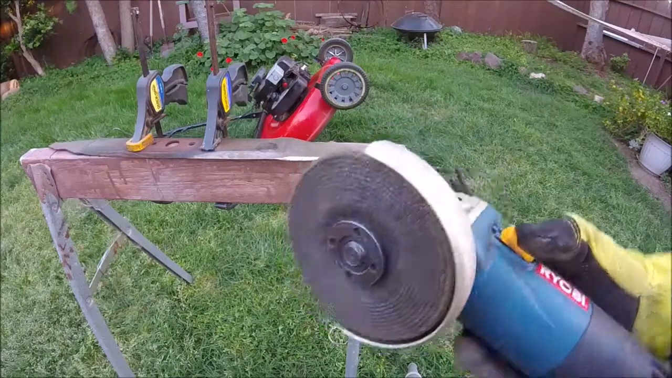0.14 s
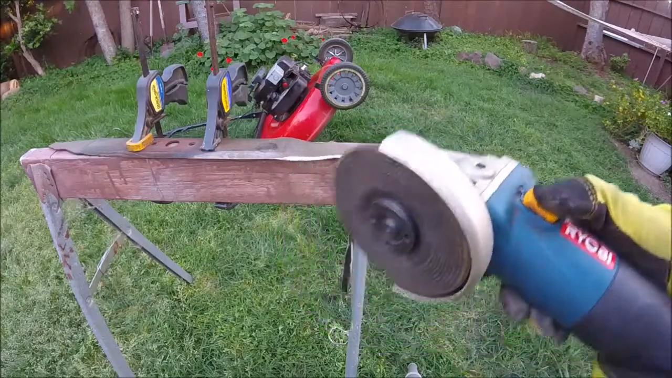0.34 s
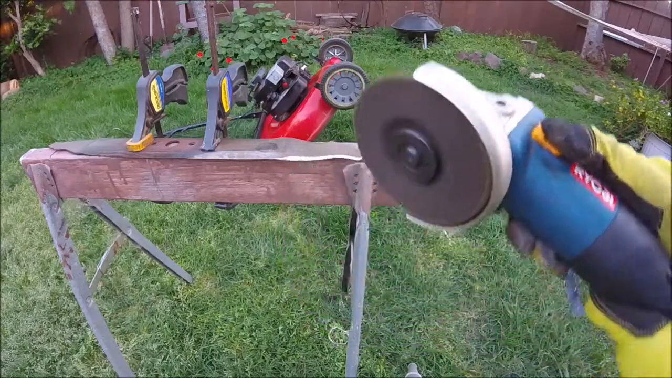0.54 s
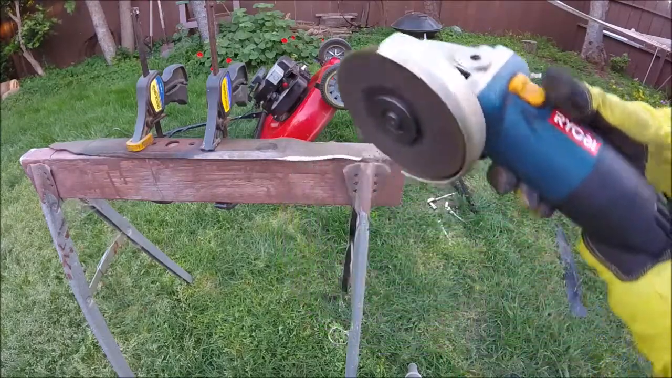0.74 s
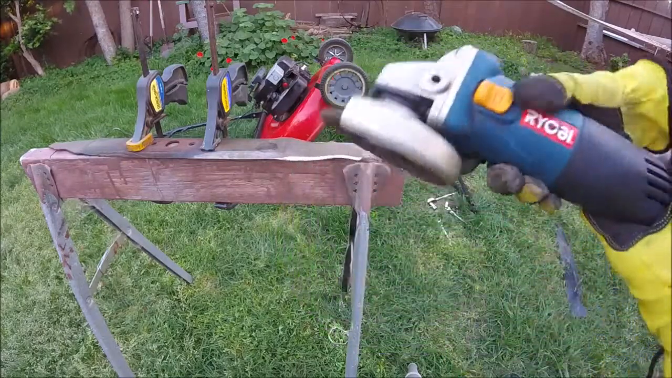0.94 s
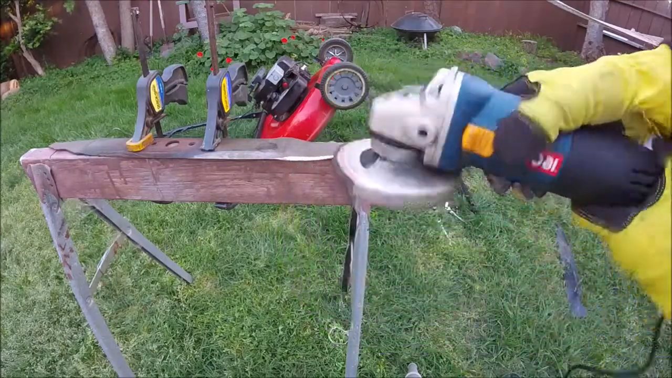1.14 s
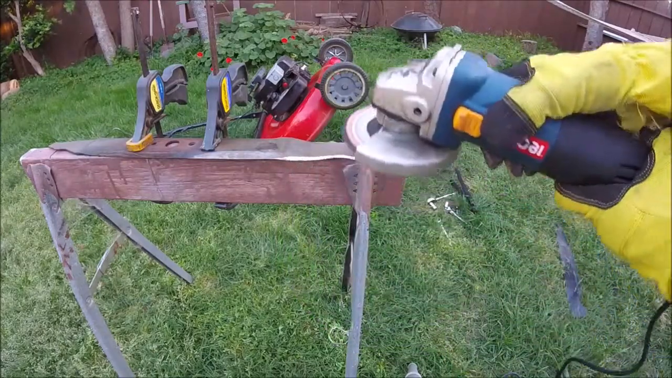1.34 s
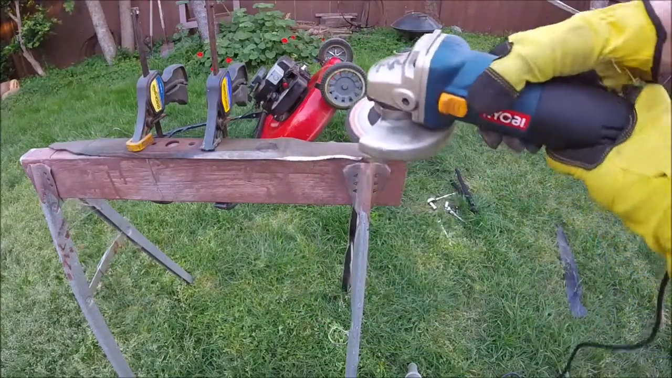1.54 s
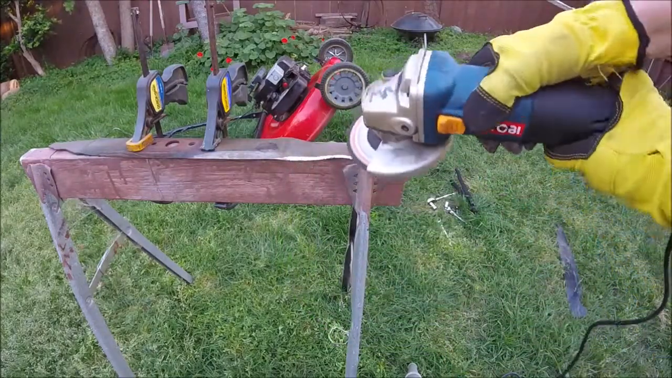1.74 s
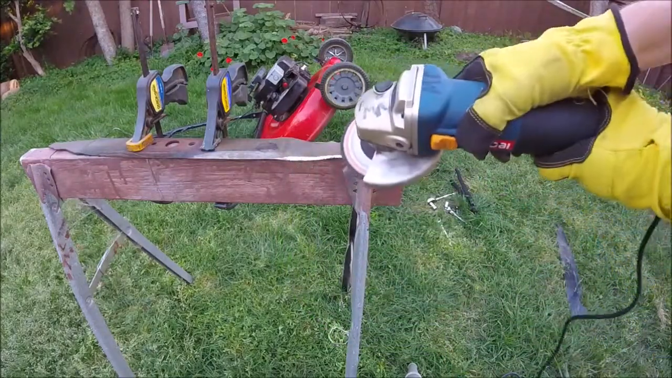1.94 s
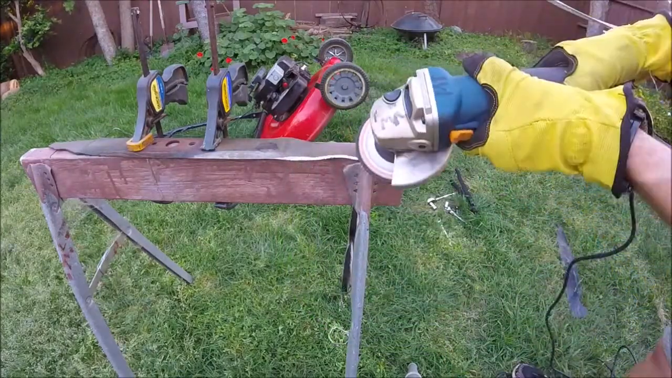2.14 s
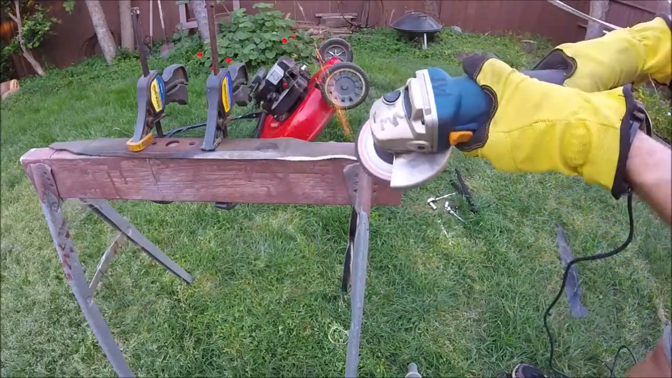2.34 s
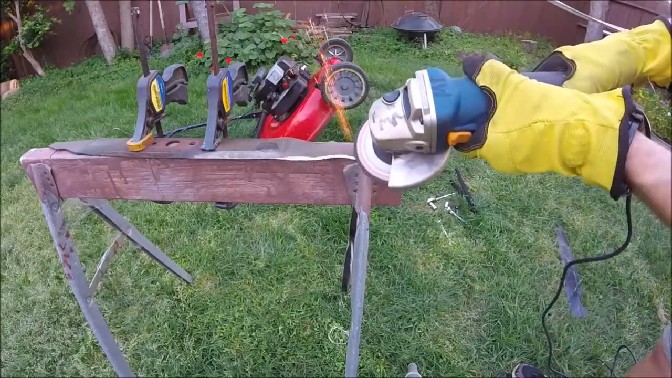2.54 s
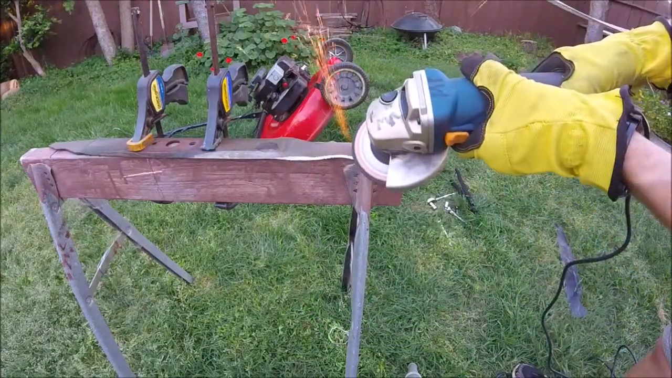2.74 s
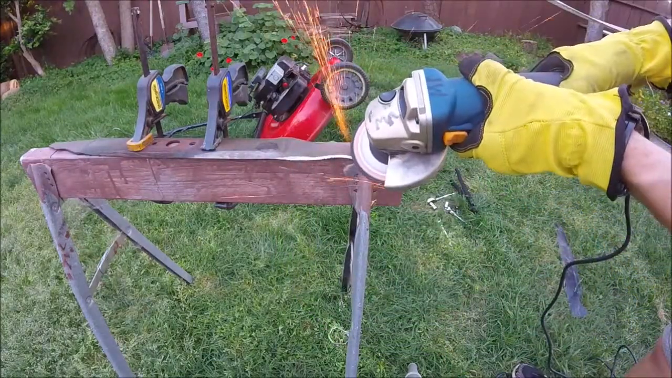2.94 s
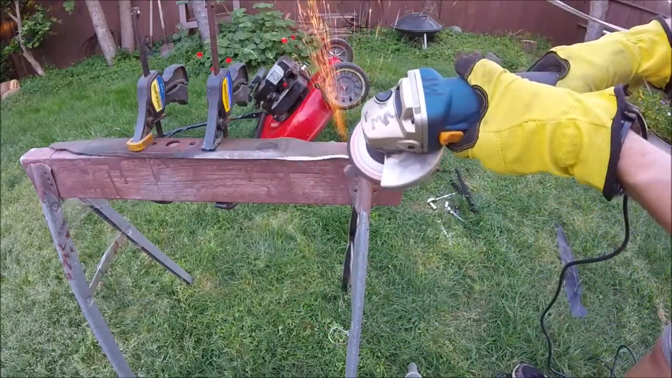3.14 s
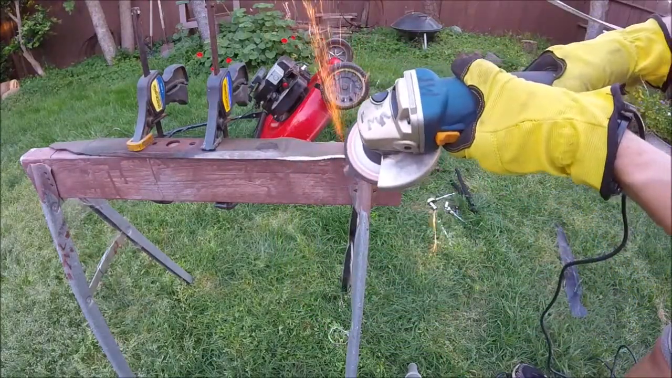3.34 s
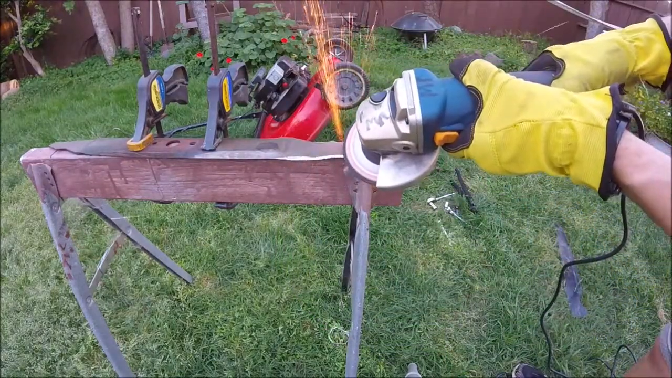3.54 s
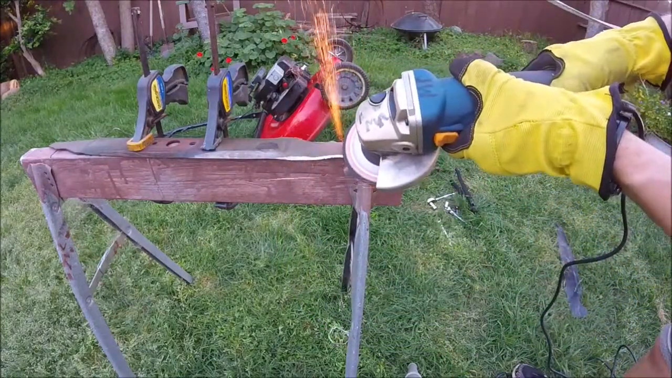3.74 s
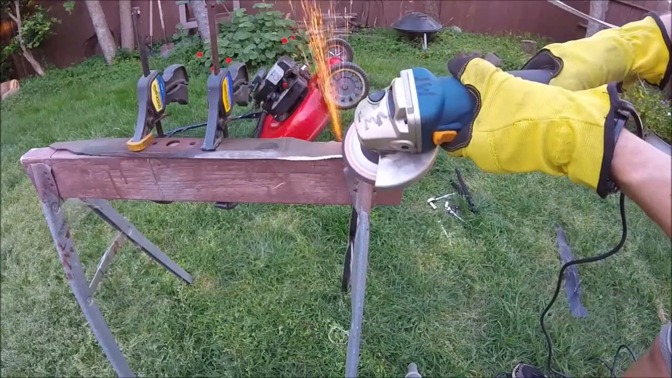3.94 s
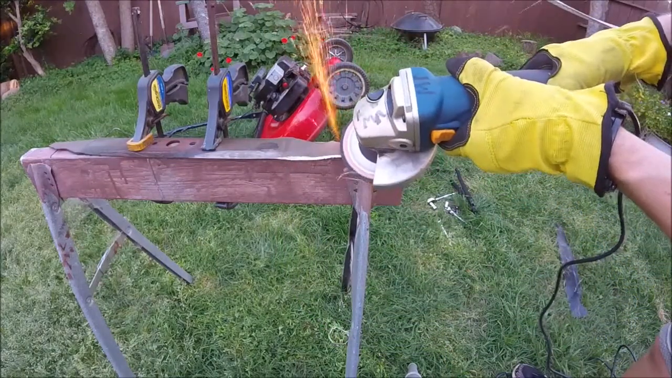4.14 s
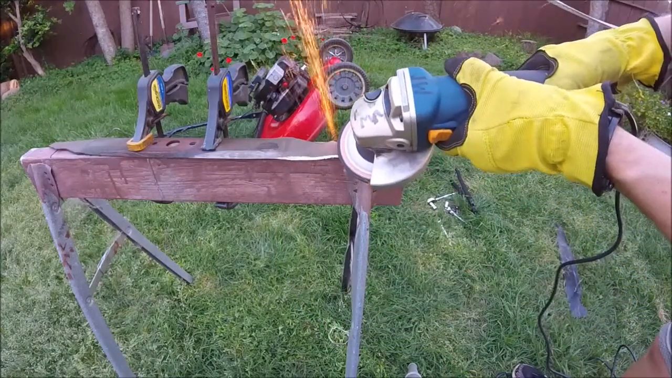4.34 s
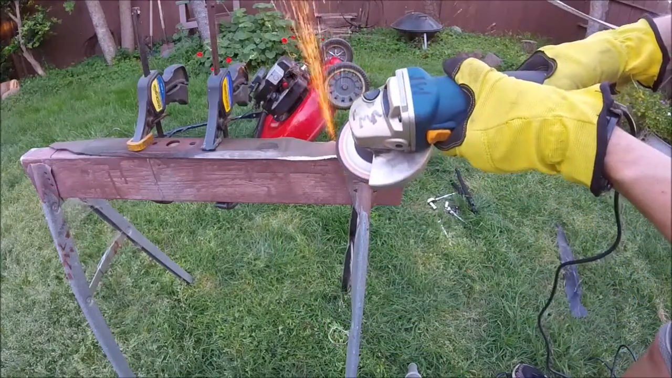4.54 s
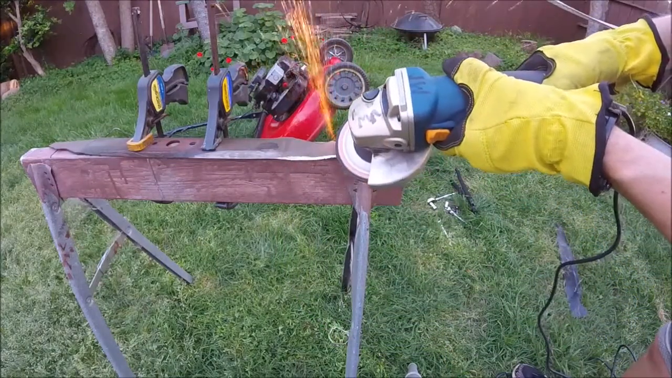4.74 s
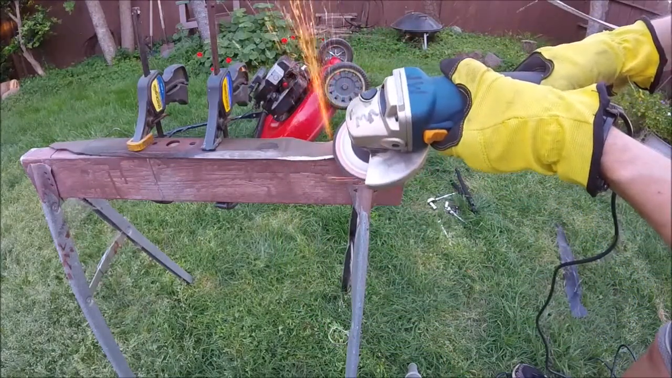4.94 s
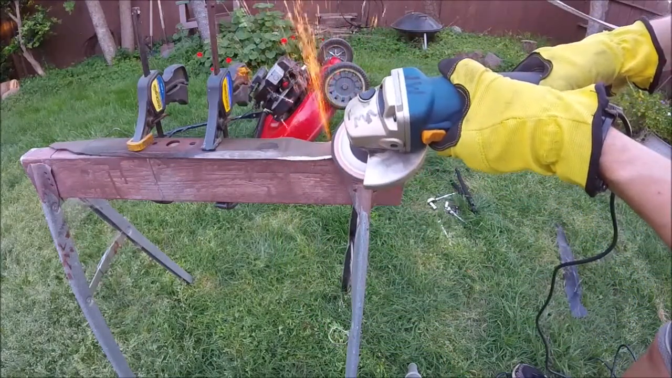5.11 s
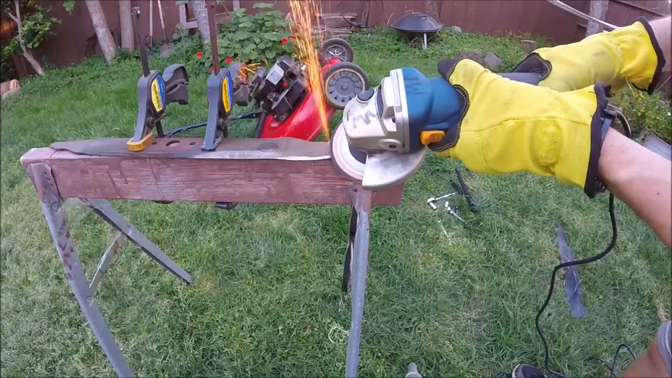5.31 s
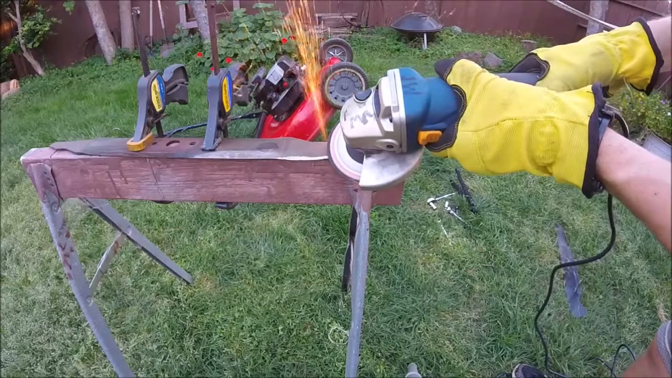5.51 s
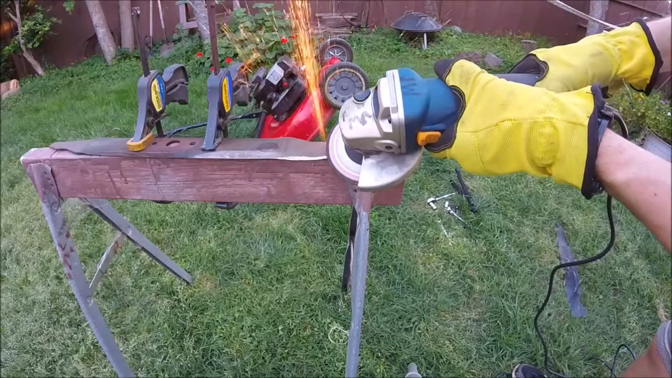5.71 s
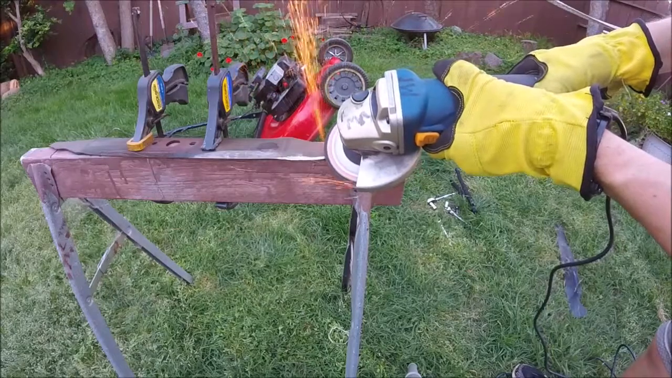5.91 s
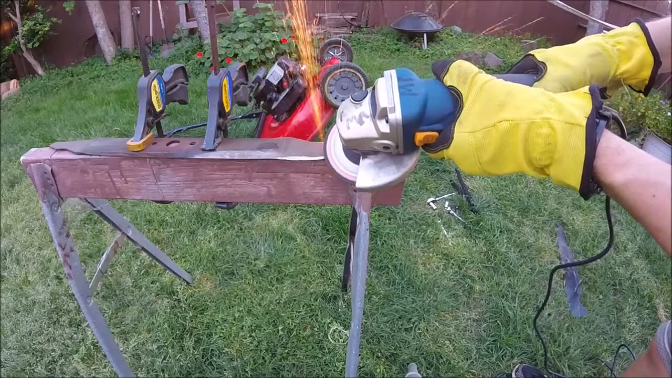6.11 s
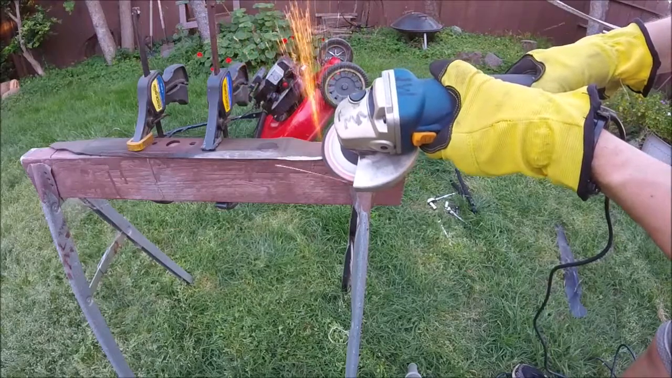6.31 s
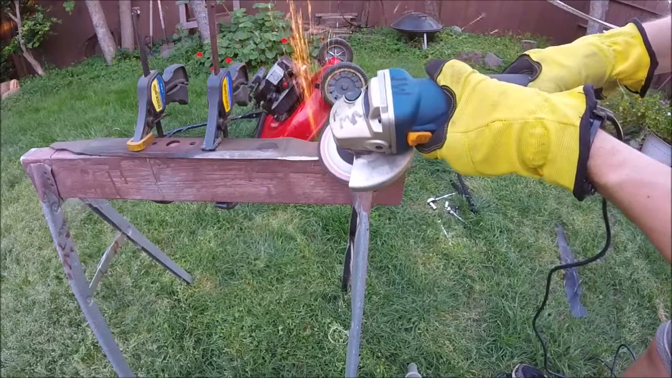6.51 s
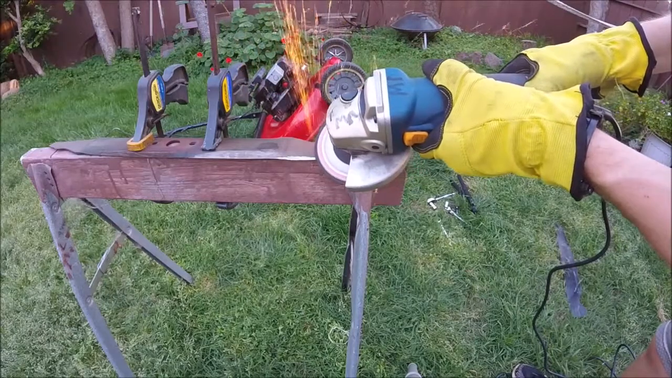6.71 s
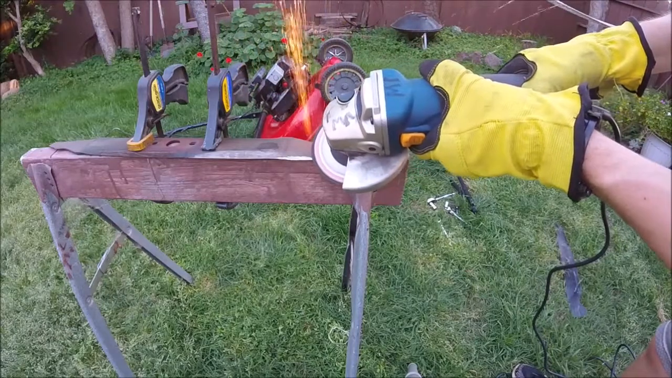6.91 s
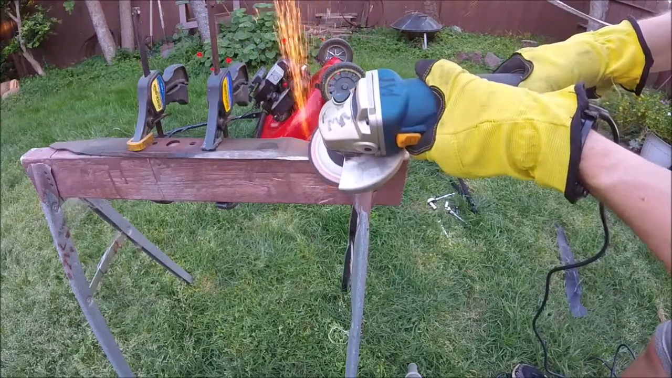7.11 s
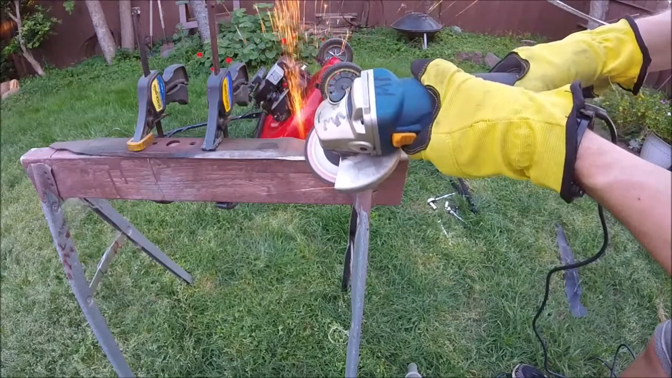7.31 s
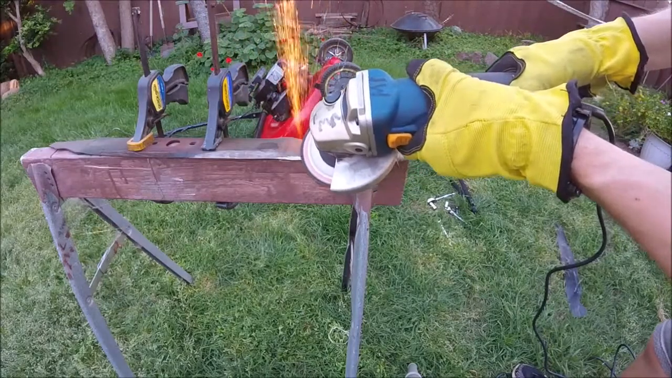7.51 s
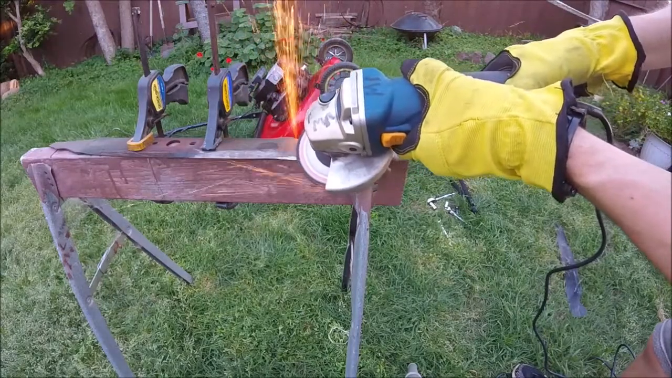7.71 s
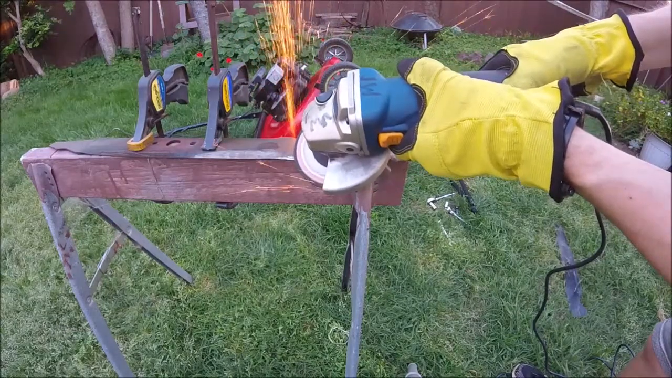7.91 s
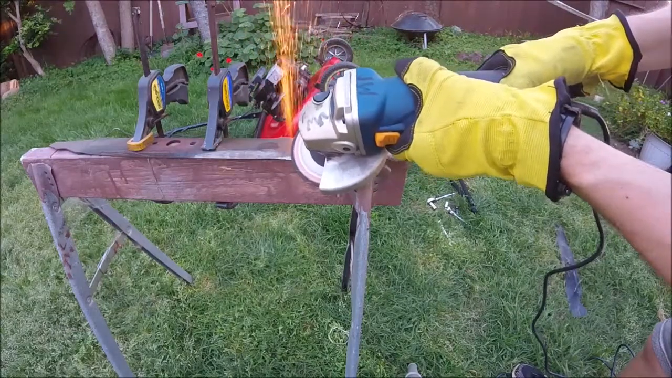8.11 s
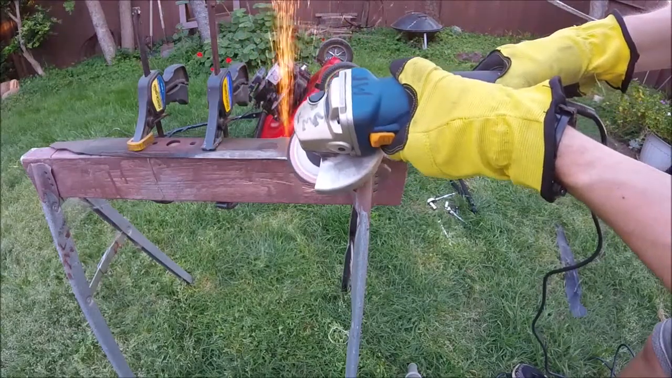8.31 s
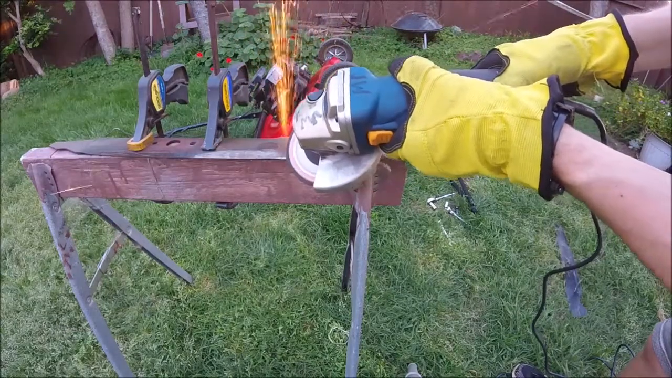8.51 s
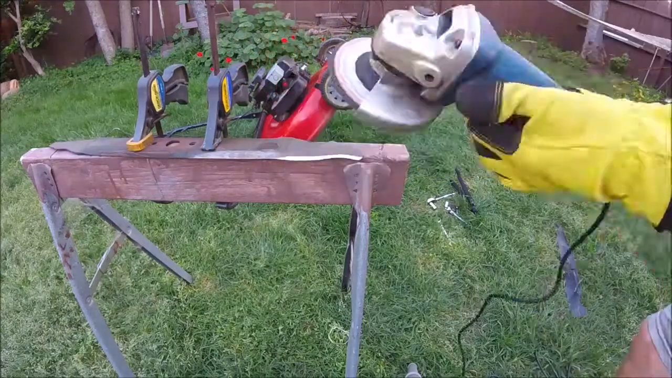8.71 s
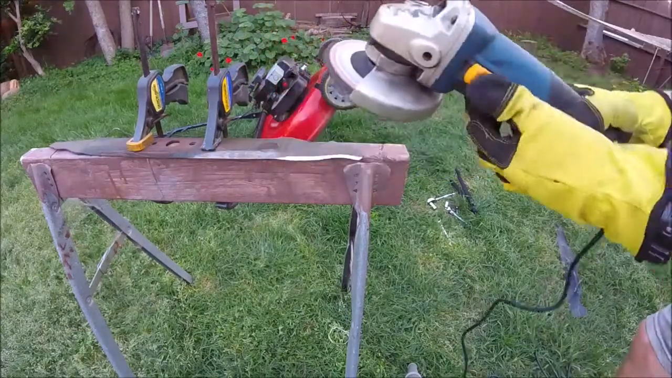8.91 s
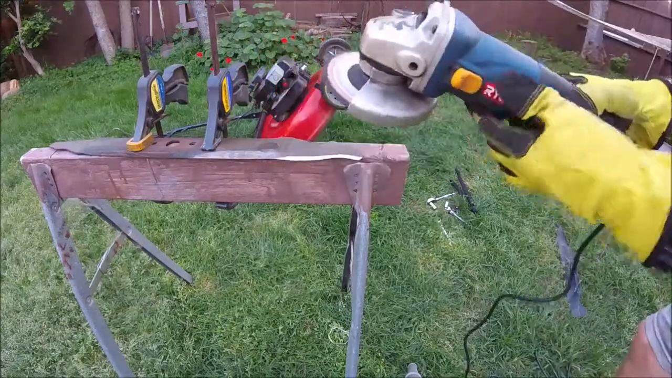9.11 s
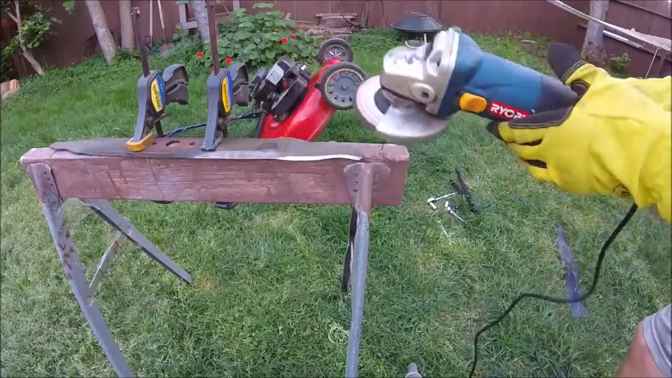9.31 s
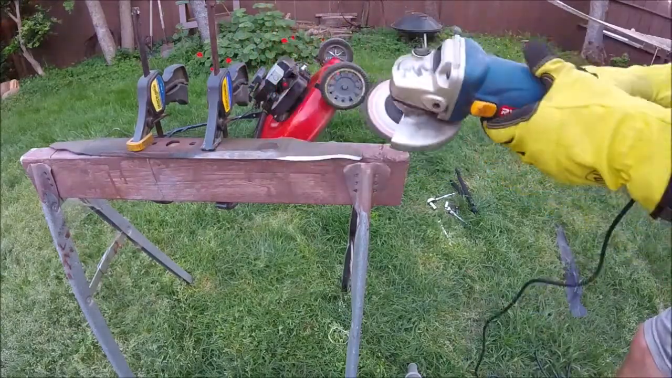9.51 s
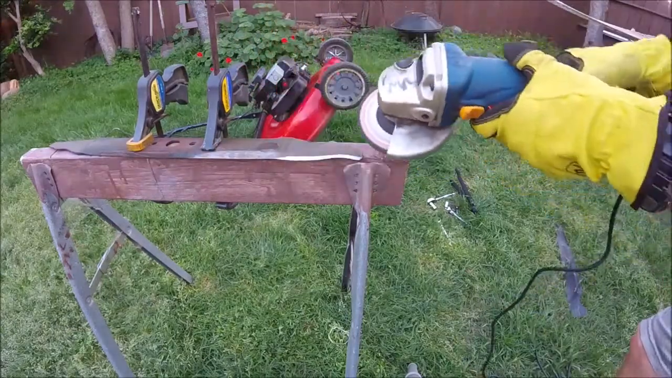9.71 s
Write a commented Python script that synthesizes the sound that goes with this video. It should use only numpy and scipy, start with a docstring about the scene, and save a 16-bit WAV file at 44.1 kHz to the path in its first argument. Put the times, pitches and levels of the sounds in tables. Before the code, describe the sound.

Close to the microphone in a back yard, an angle grinder starts with a clack of gears and spins up with a rising, rattling whine. After a tiny gap it grinds a steel mower blade, rasping, ringing and fizzing while its pitch slowly sags. Another tiny gap follows, then it runs free and begins to coast down. Air lightly buffets the microphone over a faint outdoor wash.

```python
"""An angle grinder sharpens a steel mower blade in a back yard, close to the microphone.
It kicks into life with a clack of gears; its fan hums and its bevel gears rattle and whine.
The disc rasps the steel once a turn and sets it ringing while the load drags the speed down.
Two edit cuts leave brief silent gaps between spin-up, grinding and coasting.
Air, probably from the grinder's fan, buffets the microphone, over the faint wash of the yard."""
import sys
import numpy as np
from scipy import signal
from scipy.fft import rfft, irfft
from scipy.io import wavfile
from scipy.ndimage import uniform_filter1d

SR = 44100
rng = np.random.default_rng(int(sys.argv[2]) if len(sys.argv) > 2 else 0)


def to_wav(s):
    """Save 16-bit WAV."""
    ch = np.atleast_2d(s).T  # columns
    pcm = np.round(np.clip(ch, -1, 1) * 32767)  # PCM
    wavfile.write(sys.argv[1], SR, pcm.astype(np.int16))


N = 429975
T = np.arange(N) / SR
PINION_TEETH, CROWN_TEETH = 13, 38
IDLE_HZ, BAND_LIMIT_HZ = 528, 15300
TOUCH_S, LIFT_S, POWER_OFF_S = 2.17, 8.775, 8.965

# body of the gear case and guard: frequency_hz, level_db
CASE_BODY = [(100, -36), (250, -20), (400, -13.5), (560, -6.5), (700, -1.5), (900, -2.5), (1060, -1),
             (1250, -5.5), (1450, -11), (1750, -21), (2100, -43)]
# their treble response: frequency_hz, level_db
CASE_TREBLE = [(1400, -39), (1850, -6.5), (2300, 5), (2650, 2.5), (3100, -7), (3950, 1), (4650, -12),
               (5900, -1.5), (6900, -6), (7900, -18), (9200, -24.5), (10800, -19), (13000, -21.5),
               (15000, -36.5)]
# ringing modes of the case: pitch_hz, width_hz, level_db
CASE_MODES = [(978, 20, 1), (1058.4, 24, 0)]


def gain_of(db):
    """Decibels to amplitude."""
    return 10 ** (np.asarray(db) / 20)


def unit_rms(x):
    """Scales to rms 1."""
    return x / np.sqrt(np.mean(x ** 2) + 1e-20)


def curve(rows):
    """Every column after the first, joined by straight lines in time."""
    times, *columns = np.transpose(rows)
    return [np.interp(T, times, column) for column in columns]


def drift(hz, size=2 ** 15):
    """Random wander of rms 1, up to about hz."""
    rolloff = 1 + (np.fft.rfftfreq(size, T[-1] / size) / hz) ** 4
    slow = irfft(rfft(rng.standard_normal(size)) / rolloff)
    return unit_rms(np.interp(T, np.linspace(0, T[-1], size), slow))


def narrow_noise(turns, hz):
    """Noise of rms 1 within about hz of a moving tone."""
    return unit_rms((np.exp(2j * np.pi * turns) * (drift(hz) + 1j * drift(hz))).real)


def colour(x, points, size=4096):
    """Causal filter with the given spectrum."""
    hz, db = np.transpose(points)
    log_hz = np.log(abs(np.fft.fftfreq(size, 1 / SR)) + 1)
    log_gain = np.log(gain_of(np.interp(log_hz, np.log(hz + 1), db)))
    taps = np.fft.ifft(np.exp(np.conj(signal.hilbert(log_gain)))).real
    return signal.oaconvolve(x, taps[:size // 2])[:len(x)]


def resonate(x, hz, width_hz):
    """One resonance of gain 1."""
    return signal.lfilter(*signal.iirpeak(hz, hz / width_hz, SR), x)


def knocks(per_s, spread_db):
    """Random clicks of uneven size."""
    size = gain_of(spread_db * np.minimum(rng.exponential(1, N), 4))
    return unit_rms(size * rng.choice([-1, 1], N) * (rng.random(N) < per_s / SR))


def bounces(phase, fall_turns, spread_db=1.0):
    """An envelope of rms 1 that jumps unevenly at each whole turn of the phase and dies away."""
    size = gain_of(spread_db * rng.standard_normal(2048))[phase.astype(int) % 2048]
    return unit_rms(uniform_filter1d(size * np.exp(-(phase % 1) / fall_turns), size=110))


def yard():
    """The faint, steady wash of the back yard."""
    # its spectrum: frequency_hz, level_db
    wash = [(60, -11), (120, 7.5), (200, 0), (500, -6.5), (1000, -3.5), (1700, -26), (2500, -25),
            (6000, -32.5), (9000, -37), (15000, -53)]
    return gain_of(-45) * unit_rms(colour(rng.standard_normal(N), wash))


def air_on_microphone():
    """Air, probably from the grinder's fan, buffets the microphone, with gusts and a low rumble."""
    # buffeting on the microphone: frequency_hz, level_db
    spectrum = [(20, -23), (46, 6.5), (70, 3), (110, -8), (170, -14), (300, -51), (1000, -73), (3000, -93)]
    # gusts on top of it: centre_s, half_length_s, level_db
    gusts = [(2.103, 0.25, -43), (8.88, .1, -33), (9.718, .09, -49)]
    # course of the rumble: time_s, level_db
    rumble_levels = [(0, -40), (.8, -52), (2.2, -37), (2.55, -32), (3.3, -38), (5.8, -37), (7.2, -54)]
    strength = gain_of(-46 + 0.62 * T)
    strength += sum(gain_of(db) * np.exp(-((T - s) / half) ** 2) for s, half, db in gusts)
    buffeting = unit_rms(colour(rng.standard_normal(N), spectrum, size=16384))
    rumble = narrow_noise(34.2 * T, hz=3.4) * gain_of(curve(rumble_levels)[0])
    return buffeting * strength + rumble


def motor_speed(power_on_s=.445, limit_hz=545.4, halfway_s=.2757, coast_s=4.15):
    """Turns a second: the motor spins up, labours on the steel, idles and coasts down."""
    # the motor under load: time_s, speed_hz
    loaded = [(2.18, 479), (2.45, 489.3), (2.85, 495.3), (3.42, 494.8), (3.8, 489), (4.25, 484.6),
              (5, 479.5), (5.7, 476.9), (6.1, 473), (6.35, 472), (6.85, 473.6), (7.4, 468.6), (7.95, 459.9),
              (8.76, 452.5)]
    age = np.maximum(T - power_on_s, 0)
    spin_up = limit_hz * age / (age + halfway_s)
    coasting = IDLE_HZ * np.exp(-np.maximum(T - POWER_OFF_S, 0) / coast_s)
    return np.select([T < TOUCH_S, T < LIFT_S], [spin_up, curve(loaded)[0]], coasting)


def pressed():
    """1 while the disc is on the steel, else 0."""
    return (T > TOUCH_S) * (T < LIFT_S)


def drive_gain(speed, idle_db, doubling_db, load_db, slack_db=0, jolt_db=0):
    """Gain of one part of the grinder, from its speed, its load and the state of the drive."""
    doublings = np.log2(np.maximum(speed, 1) / IDLE_HZ)
    load = pressed() * 10 * (1 - speed / IDLE_HZ)  # tenths of speed lost
    slack = np.clip((T - POWER_OFF_S) / 0.47, 0, 1)  # the drive goes slack after switch-off
    jolt = np.exp(-np.maximum(T - 0.53, 0) / 0.052)  # the jolt of the start dies away
    running_db = idle_db + doubling_db * doublings + load_db * load
    return gain_of(running_db + slack_db * slack + jolt_db * jolt)


def lulls():
    """Gain of the treble through its brief dips."""
    # dips: centre_s, half_length_s, level_db
    dips = [(1.715, .011, -4), (1.935, .015, -9), (4.215, .013, -6), (6.228, .02, -4)]
    return gain_of(sum(db * np.exp(-((T - s) / half) ** 2) for s, half, db in dips))


def roughness(turns, wear_turns, size=2048, count=32):
    """The bumps of a turning part come round every turn and slowly shift into a new pattern."""
    spectra = rfft(rng.standard_normal((count, size // 8)))
    finest = int(BAND_LIMIT_HZ / (SR * np.diff(turns).mean()))
    patterns = irfft(spectra[:, :finest], size)
    age = turns / wear_turns
    place = (turns % 1 * size).astype(int) % size
    old = patterns[age.astype(int) % count, place]
    new = patterns[(age.astype(int) + 1) % count, place]
    blend = age % 1 * np.pi / 2
    return unit_rms(np.cos(blend) * old + np.sin(blend) * new)


def fan_hum(speed, turns):
    """The fan and rotor sound their turning rate."""
    # partials of the hum: motor_order, level_db
    partials = [(1, -0.5), (2, -32), (3, -12)]
    tones = np.sqrt(2) * sum(gain_of(db) * np.sin(2 * np.pi * round(k) * turns) for k, db in partials)
    level = drive_gain(speed, idle_db=-20.5, doubling_db=11, load_db=-3.5, slack_db=-10)
    waver = gain_of(0.5 * drift(24.5) + 1.6 * drift(2.0))
    fade_in = np.clip((T - .6) / 0.16, 0, 1)
    return tones * level * waver * fade_in


def howl(speed):
    """A howl near 1 kHz follows the motor at a little over twice its rate, running free and while grinding."""
    # course of the howl: time_s, level_db, motor_order
    course = [(.8, -37, 2), (1.3, -21, 2), (2.5, -37, 2.05), (3.7, -18.5, 2.1), (4.7, -22, 2.15),
              (6.4, -42, 2.22), (7.8, -22.5, 2.28), (8.7, -30.5, 2.2), (8.82, -17.5, 2.1), (9.25, -24, 2.3)]
    level_db, order = curve(course)
    return narrow_noise(np.cumsum(speed * order) / SR, hz=52) * gain_of(level_db)


def gear_case(blows):
    """Blows sound the body of the case and set its modes ringing."""
    body = colour(blows, CASE_BODY)
    return body + sum(gain_of(db) * resonate(body, hz, width) for hz, width, db in CASE_MODES)


def gear_whine(speed, turns, lash):
    """The mesh whines in short bursts and swells as it climbs through each resonance of the case."""
    mesh = narrow_noise(PINION_TEETH * turns, hz=210) * (0.38 + 1.12 * lash)
    mesh *= drive_gain(speed, idle_db=-31.5, doubling_db=-0.5, load_db=-19, slack_db=-7, jolt_db=-5)
    mesh *= 0.92 + .5 * np.sin(2 * np.pi * turns)  # the pinion runs slightly off centre
    return colour(mesh, CASE_TREBLE)


def gear_head(speed, turns, lash_per_s=55, critical_hz=404):
    """Loose teeth rattle and tick against the case, joined by the mesh's whine and the howl."""
    torque = 1 + 0.12 * np.sin(2 * np.pi * 120 * T)  # the mains pulls twice a cycle
    teeth = roughness(turns * PINION_TEETH / CROWN_TEETH, wear_turns=40.17)
    blows = unit_rms(knocks(per_s=1500, spread_db=1.03) + .5 * rng.standard_normal(N) + 0.29 * teeth)
    blows *= torque * gain_of(1.1 * drift(51))
    rattle = unit_rms(gear_case(blows))
    rattle *= drive_gain(speed, idle_db=-15.5, doubling_db=8.5, load_db=-1, slack_db=-4, jolt_db=13.5)
    midrange = rattle + howl(speed)
    # the teeth swing across their backlash, and knock hardest around one critical speed
    lash = bounces(np.cumsum(lash_per_s * gain_of(2.5 * drift(20))) / SR, fall_turns=0.5)
    burst_depth = .55 - 0.15 * pressed() + 0.57 * np.exp(-((speed - critical_hz) / 21) ** 2)
    clatter = unit_rms(blows * (1 + 0.11 * rng.standard_normal(N)) + 0.17 * teeth)
    ticks = unit_rms(colour(clatter * (1 + burst_depth * lash), CASE_TREBLE))
    ticks *= drive_gain(speed, idle_db=-24.5, doubling_db=6.5, load_db=-1, slack_db=-2, jolt_db=10)
    treble = (ticks + gear_whine(speed, turns, lash)) * lulls()
    waver = gain_of(0.21 * drift(18))
    fade_in = np.clip((T - .472) / 0.027, 0, 1) ** 2
    return (midrange + treble) * waver * fade_in


def start_clacks(rebound_s=.005):
    """The gears slam through their backlash at switch-on; each blow rebounds and rings the case."""
    # blows of the teeth: start_s, peak_db
    clacks = [(0.4994, -3.5), (0.5113, -3), (.522, -15), (0.5373, -6), (0.544, -9), (0.554, -12),
              (.571, -7.5), (.579, -18), (0.587, -17), (0.603, -13), (0.63, -12), (.661, -15)]
    out, t = np.zeros(N), np.arange(SR // 16) / SR
    for start_s, peak_db in clacks:
        blow = (t == 0) + .3 * rng.standard_normal(len(t)) * np.exp(-t / rebound_s)
        ring = gear_case(blow) + gain_of(-37) * colour(blow, CASE_TREBLE)
        out[round(start_s * SR):][:len(t)] += gain_of(peak_db) * ring / abs(ring).max()
    return out


def at_spot(levels_db):
    """Gain that passes from one spot's level to the next as the disc moves along the edge."""
    # point of contact: time_s, spot (held within 0 to 3 below)
    path = [(4, 0), (4.6, -1.1), (5.4, 2.4), (5.9, 2), (7.1, 2), (7.4, 3.5)]
    return np.interp(curve(path)[0], np.arange(len(levels_db)), gain_of(levels_db))


def blade_modes(scrape):
    """The steel rings at fixed pitches; the spot of contact decides which modes are driven."""
    # bending modes: pitch_hz, width_hz, spot_0_db, spot_1_db, spot_2_db, spot_3_db
    modes = [(2086, 40, -16.5, -20, -26, -23), (2507, 60, -16.5, -15, -17, -5.5),
             (2610, 75, -10.5, -10, -7.5, -13.5), (3605, 40, -37, -8.5, -14, -14),
             (3730, 69, -18.5, -13, -6.5, -19.5), (4080, 32, -12.5, -15, -11, -12.5),
             (4970, 26, -27, -8, -37, -27), (5615, 46, -11.5, -11, -10, -20),
             (6060, 90, -24, -18, -12, -35), (6410, 49, -10, -9, -24, -50),
             (8100, 19, -17.5, -53, -38, -32), (8340, 110, -36, -30, -38, -13.5),
             (8920, 84, -19, -31, -16.5, -43), (9800, 31, -16, -19, -19.5, -30),
             (10830, 27, -23, -27, -34, -27), (11300, 37, -32, -20, -23, -20),
             (11760, 70, -44, -27, -26.5, -42), (12740, 50, -17, -20, -34, -30),
             (13700, 45, -22, -15, -32, -36), (14200, 45, -22, -28, -32, -34),
             (14900, 50, -24, -38, -43, -32)]
    return sum(unit_rms(resonate(scrape, hz, width)) * at_spot(db) for hz, width, *db in modes)


def blade_low_ring(drive, pitch_hz=1640, width_hz=100):
    """The blade's lowest ring, loudest at the last spot on the edge."""
    ring = resonate(resonate(drive, pitch_hz, width_hz), pitch_hz, width_hz)
    return unit_rms(ring) * at_spot((-51, -40.5, -34.5, -32))


def blade_shake(speed, disc_turns):
    """The uneven disc shakes the blade, harder as the load grows."""
    # partials of the wobble: disc_order, level_db
    wobble = [(1, -50.5), (2, -42), (5, -34), (6, -29.5), (8, -36), (9, -38.5)]
    tones = sum(gain_of(db + 1.25 * drift(5.1)) * np.sin(2 * np.pi * round(k) * disc_turns)
                for k, db in wobble)
    return np.sqrt(2) * tones * drive_gain(speed, idle_db=-7.5, doubling_db=1, load_db=6)


def grinding(speed, turns):
    """The disc's rough rim and loose grit scrape the blade, which rasps, rings and fizzes."""
    # how hard the disc is pressed on the edge: time_s, pressure_db
    pressure = [(2.2, -22), (2.3, -4), (2.37, -14), (2.46, 0.5), (2.86, 4), (3.2, -4.5), (4.06, -7),
                (4.35, -4.5), (4.75, -3), (5.06, 1), (5.9, -1), (6.26, -6.5), (6.6, -4), (7.2, -0.5),
                (8.3, 3), (8.7, -3)]
    # the pressed disc bouncing on the steel: time_s, depth_fraction
    bouncing = [(2.2, 0.32), (5.6, 0), (6.1, 0.56), (7.5, 0.54), (8.15, 0.7), (8.7, 0.42)]
    # broad rasp of stone on steel: frequency_hz, level_db
    rasp_spectrum = [(1200, -5), (1800, -23), (2100, 1.5), (2550, 1), (3150, -1), (3700, 1.5), (4100, -7),
                     (4650, -7.5), (5100, 1), (5900, 1), (6600, 3.5), (7200, -2.5), (7900, -8),
                     (9500, -26.5)]
    # fizz of the flying grit: frequency_hz, level_db
    fizz_spectrum = [(6000, -21), (7400, 13), (8200, 12.5), (8900, 9.5), (9450, -3), (10200, 15),
                     (11000, -20), (11800, 10), (12400, 7), (12900, -9), (13900, 6), (14900, -39),
                     (15400, -8)]
    pressure_db = curve(pressure)[0] + 2.9 * drift(2.5)  # the hand is never quite steady
    disc_turns = turns * PINION_TEETH / CROWN_TEETH
    depth = np.clip(curve(bouncing)[0], 0, 1)
    # the disc bounces about every third turn, and bites harder once a turn
    chatter = 1 - depth + depth * bounces(disc_turns / 3 + .11 * drift(6) + 2, fall_turns=.38)
    bite = 1 + 0.3 * np.sin(2 * np.pi * disc_turns) + 0.48 * np.sin(2 * np.pi * turns)
    bite *= chatter * gain_of(0.85 * drift(96))
    rim = roughness(disc_turns, wear_turns=126.9) * (1 - 0.71 * depth)  # bouncing breaks up the pattern
    grit = knocks(per_s=16000, spread_db=1.0)
    rasp = gain_of(-2.6) * unit_rms(colour(bite * (1.4 * rim + grit), rasp_spectrum))
    ringing = gain_of(.3) * blade_modes(bite * chatter * (.7 * rim + grit))
    steel = (rasp + ringing) * gain_of(-24 + 0.37 * pressure_db)
    fizz = unit_rms(colour(bite * (0.59 * rim + grit), fizz_spectrum)) * gain_of(-33.5 + pressure_db)
    low_ring = blade_low_ring(np.sin(2 * np.pi * 10 * disc_turns) * bite + 5 * grit)
    thump = unit_rms(resonate(chatter * grit, hz=298, width_hz=210))  # each bounce thumps the trestle
    thump *= depth * gain_of(-41 + .5 * pressure_db)
    return pressed() * ((steel + fizz) * lulls() + blade_shake(speed, disc_turns) + thump + low_ring)


def scene():
    """One motor drives fan, gears and disc, close to a single microphone with the yard behind."""
    speed = motor_speed()
    turns = np.cumsum(speed * (1 + 0.00042 * drift(10.8))) / SR
    grinder = fan_hum(speed, turns) + gear_head(speed, turns) + start_clacks() + grinding(speed, turns)
    return (grinder + air_on_microphone() + yard())[None]


def record(dry):
    """Two edit cuts leave brief gaps; the sound is held to full scale and loses its highest treble."""
    # gaps at the cuts: start_s, end_s
    edit_gaps = [(2.149, 2.182), (8.758, 8.7895)]
    gate = 1 - .995 * sum((T > start_s) & (T < end_s) for start_s, end_s in edit_gaps)
    lowpass = signal.firwin(301, BAND_LIMIT_HZ, window=("kaiser", 8), fs=SR)
    return signal.oaconvolve(np.clip(dry * gate, -1, 1), lowpass[None], "same")


dry = scene()
out = record(dry)
to_wav(out)
```